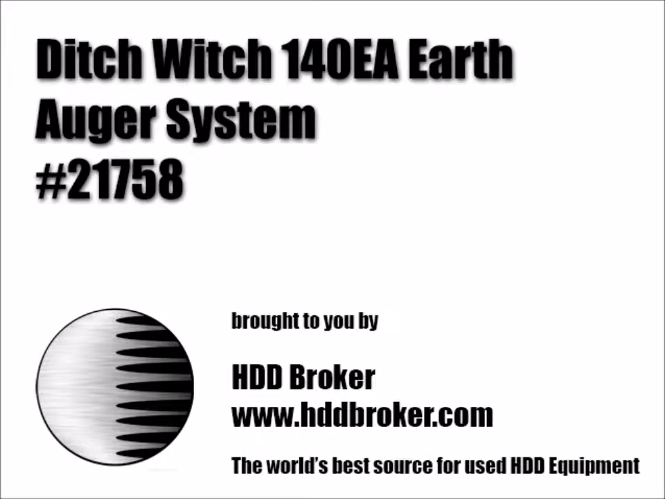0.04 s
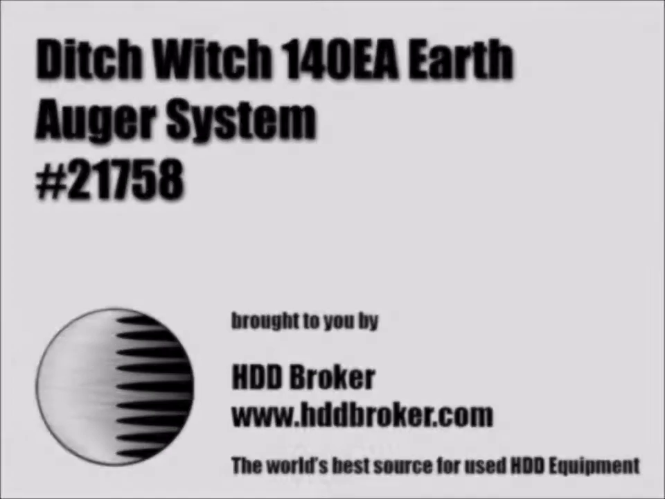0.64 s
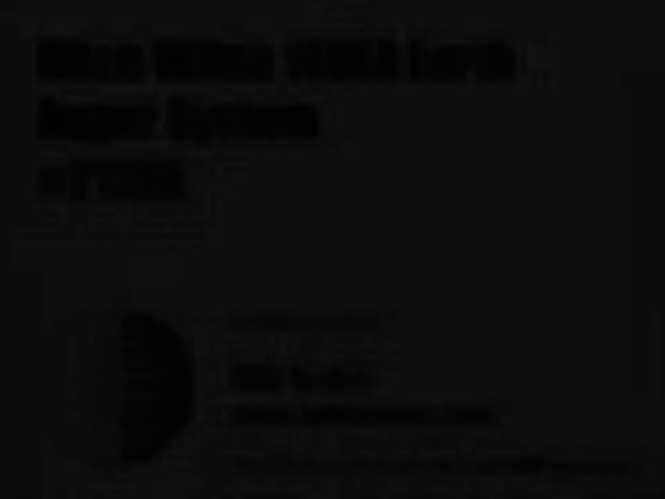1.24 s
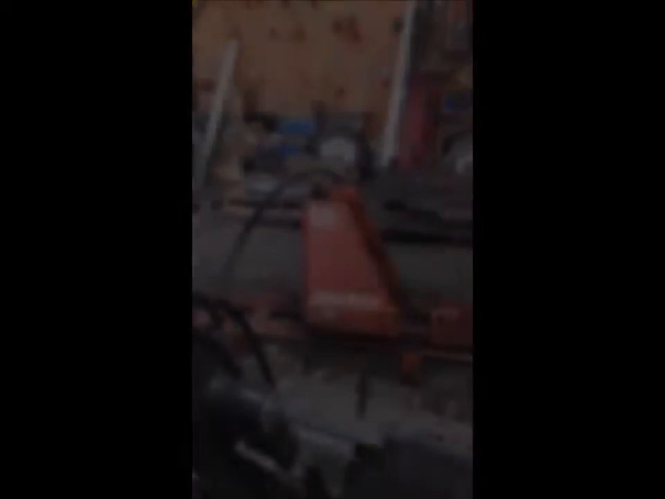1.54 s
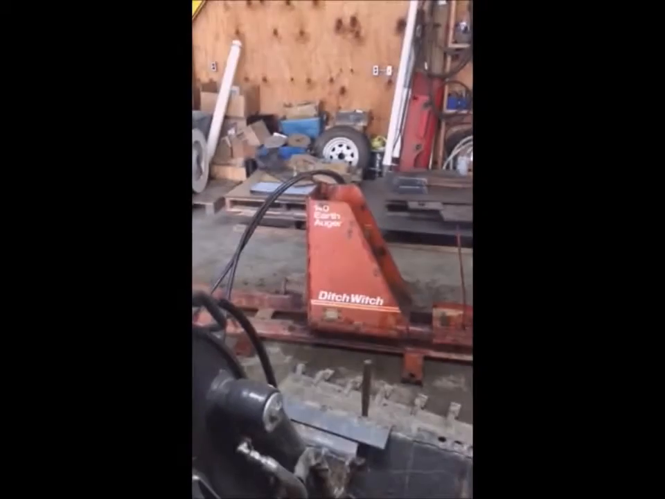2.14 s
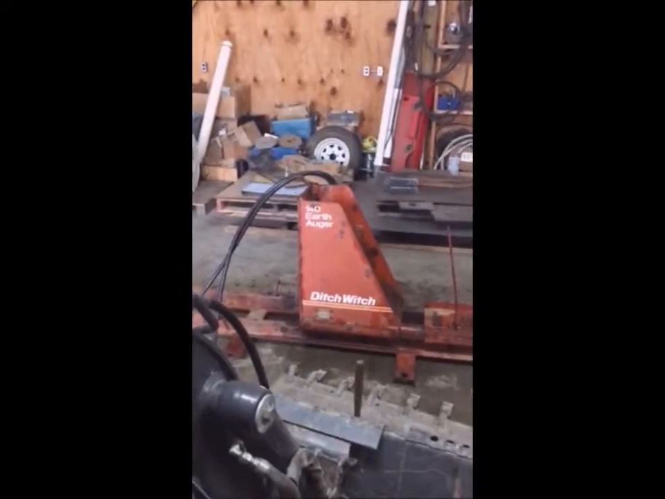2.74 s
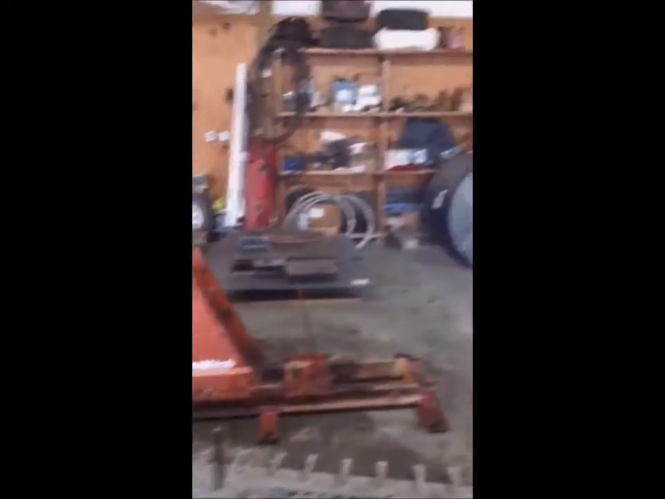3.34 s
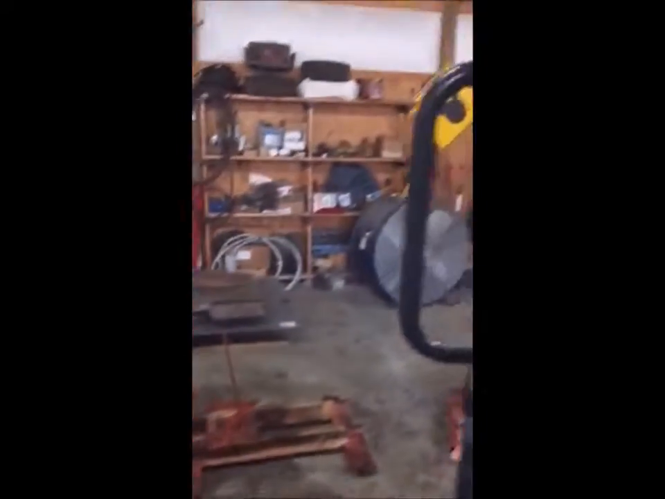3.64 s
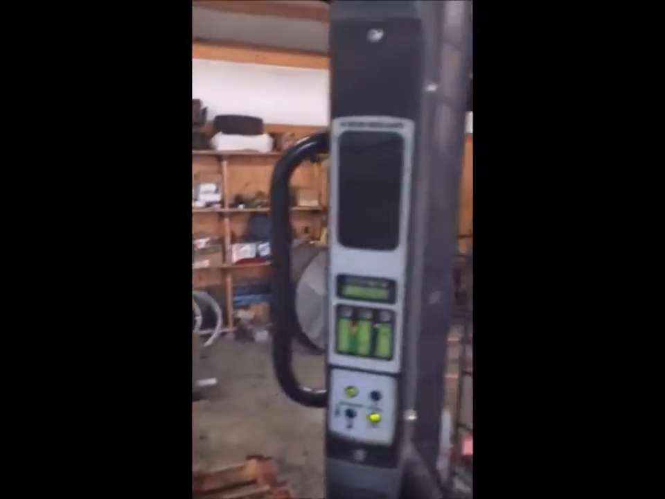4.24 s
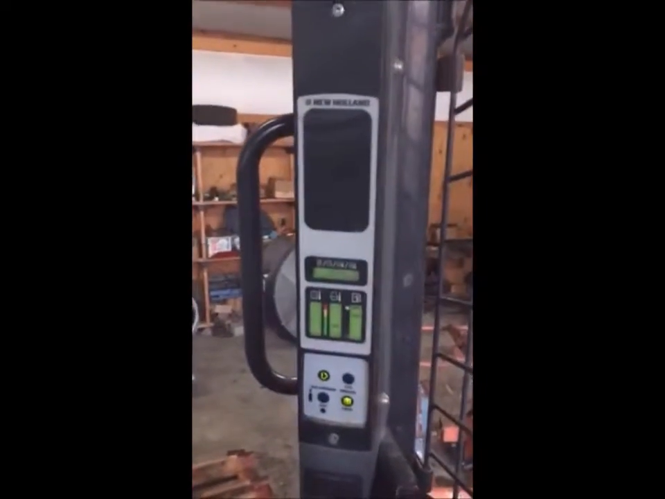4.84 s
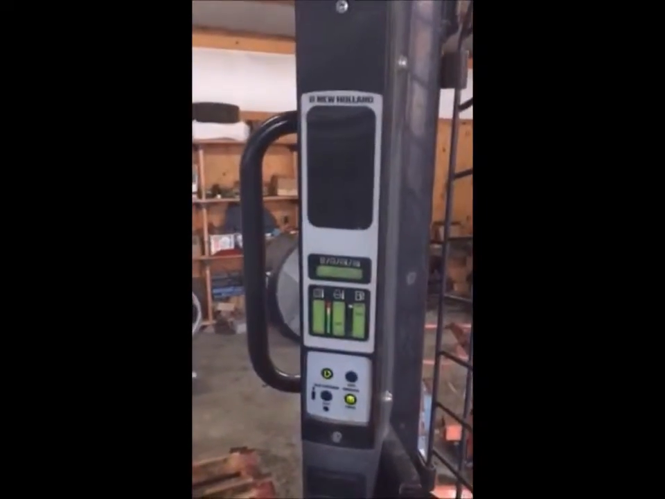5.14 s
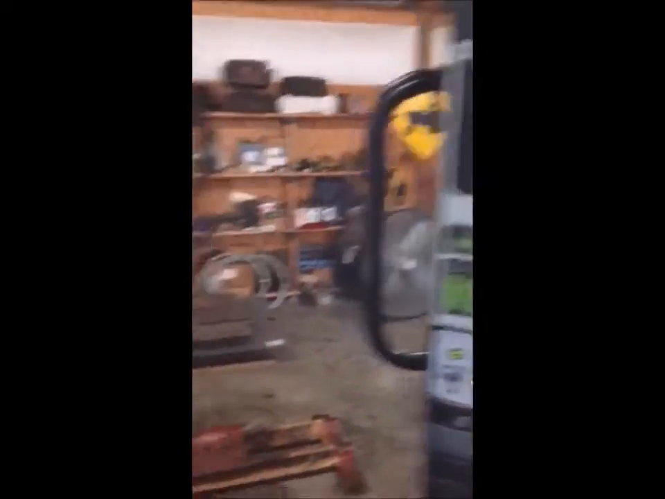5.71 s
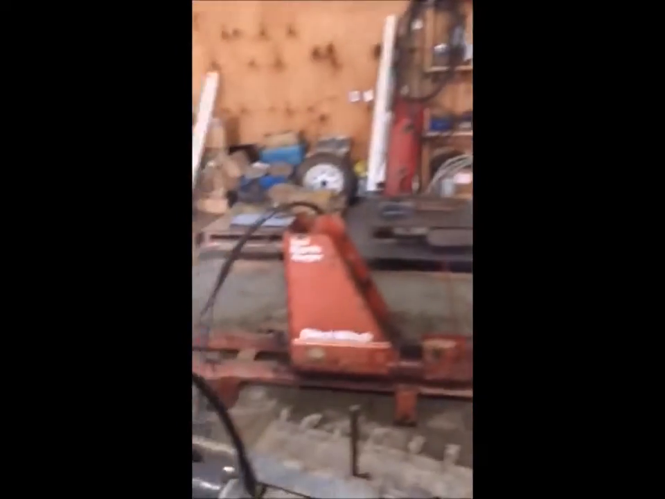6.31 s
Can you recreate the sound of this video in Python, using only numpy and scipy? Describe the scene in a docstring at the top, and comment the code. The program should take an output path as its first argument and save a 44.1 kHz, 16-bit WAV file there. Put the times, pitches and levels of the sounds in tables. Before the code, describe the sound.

After a brief silence, the sound of a diesel loader driving an earth auger cuts in, close and steady inside a workshop. A strong gear whine sits over a low hum, exhaust rumble, knocking and valve clatter, with hydraulic whine and hiss above. As the microphone in the cab turns away about halfway through, the whine softens, then comes back strongly near the end.

```python
"""In a workshop, a four-cylinder diesel loader runs at a governed speed and drives an earth auger.
A strong gear whine, the firing hum, gas rumble, knock and valve clatter are locked to the engine cycle;
a seven-piston hydraulic unit whines, and its pulsating oil jet hisses and rings the pipes.
The microphone in the cab turns from the auger to the door post and most of the way back,
through the standing waves of the whine. The sound cuts in after a silent start."""
import sys
import numpy as np
from scipy import signal
from scipy.fft import rfft, irfft, next_fast_len
from scipy.io import wavfile
from scipy.ndimage import map_coordinates

SR = 44100
rng = np.random.default_rng(int(sys.argv[2]) if len(sys.argv) > 2 else 0)


def output_pcm(signal):
    """Save a mono or channel-first signal as 16-bit PCM at the path in sys.argv[1].

    Samples are clipped to [-1, 1] before scaling.
    """
    pcm = np.clip(np.atleast_2d(signal).T, -1, 1) * 32767
    wavfile.write(sys.argv[1], SR, np.round(pcm).astype(np.int16))


N = 280917

# Levels are relative within each source; orders are rounded to whole numbers in use.
# microphone path: t/s, place (0 = auger, 1 = door post)
MIC_PATH = [(3.12, 0.039), (3.6, 0.48), (4.4, 0.68), (5.55, 1), (5.88, 0.4), (6.3, 0.18)]
# spectrum of the oil jet: f/Hz, level/dB
JET_SPECTRUM = [(700, -30), (1700, -8), (2700, -3), (3250, -1.5), (4000, -9.5), (4900, -10.5), (5900, -1.5),
                (6800, 0), (7700, -1.5), (8600, -2.5), (10400, -8.5), (11300, -10), (13000, -14),
                (15600, -19)]
# modes of valve block and pipes: f/Hz, bandwidth/Hz, level at auger/dB, level at post/dB
PIPE_MODES = [(3170, 100, -1, -4.5), (5520, 29, -2, -11), (6550, 88, -0.5, 0.5), (6930, 180, -1.5, -4),
              (8300, 100, -3, -18), (8790, 80, -10, -13)]
# knock of each cylinder, in firing order: level/dB
KNOCK_LEVELS = [-1.5, -1.5, -7, -13]
# modes of the engine block: f/Hz, bandwidth/Hz, level/dB
BLOCK_MODES = [(1649, 104, 3.5), (2050, 130, -5.5), (3230, 200, -12)]
# spectrum of valve and injector impacts: f/Hz, level/dB
IMPACT_SPECTRUM = [(200, -38), (500, -8), (620, -0.5), (850, -2.5), (1020, -1), (1300, -5), (1450, -4.5),
                   (1650, -3.5), (2000, -6), (2300, -6), (2800, -13.5), (3250, -10.5), (4200, -17),
                   (6000, -28), (15000, -55)]
# engine tones: order of the four-stroke cycle, level at auger/dB, level at post/dB
ENGINE_TONES = [(7, -42, -36), (11, -45, -42), (13, -39, -41), (22, -50, -45), (28, -37, -46),
                (38, -39.5, -39.5), (44, -44.5, -47), (62.57, -53, -43), (100.5, -43, -40.5),
                (105.3, -46, -54), (106.9, -45.5, -44), (121, -56, -47.5), (149.9, -59, -47)]
# hydraulic tones: order of the pump shaft, level at auger/dB, level at post/dB
PUMP_TONES = [(6, -40, -33.5), (21, -31.5, -34), (28, -48, -44), (34, -45, -51), (35, -29, -32.5),
              (36, -43, -45), (50, -44, -52)]
# spectrum of exhaust and intake noise: f/Hz, level/dB
GAS_SPECTRUM = [(20, -24), (45, -11), (75, -2.5), (105, 1.5), (135, -2.5), (165, 1.5), (215, -2), (260, -7),
                (370, -8.5), (480, -16), (700, -15), (1300, -23), (2500, -33), (6000, -45.5)]
# overtones of the firing pulse: harmonic number, level at auger/dB, level at post/dB
FIRING_OVERTONES = [(2, -24.5, -25), (3, -34, -31.5), (4, -53, -39.5), (5, -67, -49)]
# gear mesh tone at the microphone: t/s, level/dB
MESH_LEVEL = [(0.7, -17), (2.95, -17), (3.23, -18), (3.61, -31), (4.4, -22.5), (6.0, -24.5), (6.22, -17.5),
              (6.35, -16)]
# mesh overtones standing in the cab, each with one loud or dead spot:
# harmonic number, level at auger/dB, level at post/dB, spot place, spot width, gain at spot/dB
STANDING_WAVES = [(2, -31, -34.5, 0.46, 0.17, 5), (3, -35.5, -42.5, 0.24, 0.1, -12)]
# brief dips of the treble: t/s
TREBLE_DIPS = [2.110, 3.241, 6.142]

RPM, CYLINDERS, GEAR_TEETH = 1881, 4, 12
PISTONS, PUMP_RATIO = 7, 0.64  # pump turns per crank turn


def amp(db):
    """Amplitude ratio of a level in decibels."""
    return np.exp(np.asarray(db) * np.log(10) / 20)


def unit(x):
    """Normalisation to rms 1."""
    return x / np.sqrt(np.mean(x ** 2) + 1e-20)


def curve(rows):
    """Linear interpolation of (t/s, value) rows at every sample."""
    return np.interp(np.arange(N) / SR, *np.transpose(rows))


def wobble(rate):
    """Smooth random fluctuation: a spline of rms about 1 through `rate` knots a second."""
    knots = rng.standard_normal(int(N * rate / SR) + 4)
    steps = np.arange(0, len(knots) - 1, 1 / 8)
    return np.interp(np.arange(N) * rate / SR, steps, unit(map_coordinates(knots, [steps])))


def spot(place, centre, width):
    """Gaussian weighting of place, 1 at the centre."""
    return np.exp(-((place - centre) / width) ** 2)


def filtered(x, response):
    """Linear filtering: the spectrum of x is multiplied by a frequency response."""
    size = next_fast_len(N + SR // 2)
    return irfft(rfft(x, size) * response(np.fft.rfftfreq(size, 1 / SR)), size)[:N]


def lowpass(x, cutoff_hz, slope):
    """Zero-phase low-pass: above the cutoff, amplitude falls as frequency to the power -slope."""
    return filtered(x, lambda hz: 1 / (1 + (hz / cutoff_hz) ** slope))


def coloured(x, spectrum):
    """Spectral shaping by (f/Hz, level/dB) points, at rms 1."""
    f, db = np.transpose(spectrum)
    return unit(filtered(x, lambda hz: amp(np.interp(np.log(hz + 1), np.log(f), db))))


def resonances(x, modes):
    """Modal superposition: x drives damped resonators of alternating sign; the sum has rms 1."""
    def response(f):
        return sum((-1) ** k * amp(db) * 1j * f * width / (f0 ** 2 - f ** 2 + 1j * f * width)
                   for k, (f0, width, db) in enumerate(modes))
    return unit(filtered(x, response))


def ring(t60):
    """Impulse response of dense modes: noise of energy 1 that decays by 60 dB in t60 seconds."""
    t = np.arange(SR // 8) / SR
    tail = rng.standard_normal(len(t)) * amp(-60 * t / t60)
    return tail / np.linalg.norm(tail)


def cab_reflections(x, facing, wet_db, t60):
    """Reverberation: cab and workshop add reflections whose pattern changes as the microphone turns."""
    front, side = (signal.oaconvolve(x, ring(t60))[:N] for _ in range(2))
    return unit(x + amp(wet_db) * (np.sqrt(1 - facing) * front + np.sqrt(facing) * side))


def oil_flow(pump_turns, spurt, fade_strokes, scatter_db, grain_db):
    """Flow ripple: each piston adds a decaying, crackling spurt to the steady strength of the jet."""
    strokes = pump_turns * PISTONS
    stroke = strokes.astype(int)
    piston_db = 1.1 * unit(rng.standard_normal(PISTONS))
    stroke_db = scatter_db * rng.standard_normal(N // 100)
    size = amp(piston_db[stroke % PISTONS] + stroke_db[stroke])
    decay = np.exp(-(strokes % 1) / fade_strokes)
    return (1 + spurt * size * decay) * amp(grain_db * wobble(2500))


def pipe_ring(flow, place, facing):
    """Forced resonance: the jet rings the pipes, and each side of the cab favours different modes."""
    jet = flow * rng.standard_normal(N)
    at_auger = resonances(jet, [(hz, width, db) for hz, width, db, _ in PIPE_MODES])
    at_post = resonances(jet, [(hz, width, db) for hz, width, _, db in PIPE_MODES])
    level = -39.5 + 4.5 * spot(place, centre=0.33, width=0.23)  # highest when facing the pipes
    return amp(level) * ((1 - facing) * at_auger + facing * at_post)


def oil_hiss(flow, facing):
    """Jet noise follows the flow; towards the post its lower band rises and its top is shaded."""
    jet = coloured(flow * rng.standard_normal(N), JET_SPECTRUM)
    hiss = cab_reflections(jet, facing, wet_db=-4, t60=0.098)
    lower = lowpass(hiss, cutoff_hz=7900, slope=8)
    return amp(-34 + 2 * facing) * lower + amp(-34 - 2 * facing) * (hiss - lower)


def combustion_knock(cycles, fade_firings):
    """Transient excitation: each firing drives the block's modes with a burst, uneven among cylinders."""
    firings = cycles * CYLINDERS
    level = np.array(KNOCK_LEVELS)[firings.astype(int) % CYLINDERS]
    burst = rng.standard_normal(N) * amp(level) * np.exp(-(firings % 1) / fade_firings)
    return unit(lowpass(resonances(burst, BLOCK_MODES), cutoff_hz=4000, slope=4))


def valve_clatter(cycles, t60, scatter_db, jitter_s, parts):
    """Impact sound: each valve or injector strikes at its own angle of the cycle and rings the block."""
    out = np.zeros(N + SR)
    whole_cycles = np.arange(int(cycles[-1]) + 1)
    for part in range(parts):
        angle = (part + rng.random()) / parts
        tick = ring(t60)
        late, size = rng.standard_normal((len(whole_cycles), 2)).T
        due = np.interp(whole_cycles + angle, cycles, np.arange(N), right=N + SR // 2)
        onsets = np.abs(due + late * jitter_s * SR).astype(int)
        for at, gain in zip(onsets, amp(scatter_db * size)):
            out[at:at + len(tick)] += gain * tick
    return coloured(out[:N], IMPACT_SPECTRUM)


def shaft_tones(turns, orders, facing, waver_db):
    """Rotational harmonics: tones locked to a shaft waver in level and vary with microphone direction."""
    out = np.zeros(N)
    waver = waver_db * wobble(5.4)
    for order, auger_db, post_db in orders:
        start, shift = rng.random(2)
        level = auger_db + (post_db - auger_db) * facing + np.roll(waver, int(shift * N))
        out += amp(level) * np.sin(2 * np.pi * (round(order) * turns + start))
    return np.sqrt(2) * out


def gas_rumble(cycles, throb):
    """Amplitude modulation: exhaust and intake noise swells with each firing."""
    swell = 1 + throb * np.cos(2 * np.pi * CYLINDERS * cycles)
    return coloured(rng.standard_normal(N) * swell, GAS_SPECTRUM)


def firing_hum(cycles, place, facing):
    """Fourier series of the firing pulse: one pressure wave per firing, rising steeply, falling slowly."""
    phase = 2 * np.pi * CYLINDERS * cycles
    fundamental_db = -24 - 1.5 * place + 1.4 * wobble(5)
    overtones = sum(amp(auger_db + (post_db - auger_db) * facing) * np.sin(round(k) * phase)
                    for k, auger_db, post_db in FIRING_OVERTONES)
    return np.sqrt(2) * (amp(fundamental_db) * np.sin(phase) + overtones)


def gear_whine(crank_turns, place, flutter_db, waver_rad):
    """Periodic tooth contact radiates a mesh tone, whose overtones form standing waves in the cab."""
    phase = 2 * np.pi * GEAR_TEETH * crank_turns + waver_rad * wobble(20)
    out = amp(curve(MESH_LEVEL) + 0.28 + flutter_db * wobble(25.02)) * np.cos(phase)
    for k, auger_db, post_db, centre, width, spot_db in STANDING_WAVES:
        level = auger_db + (post_db - auger_db) * place + spot_db * spot(place, centre, width)
        out += amp(level + k * flutter_db * wobble(25.2)) * np.cos(round(k) * phase)
    return np.sqrt(2) * out


def scene():
    """Superposition: engine and hydraulics, locked to the crank, add at the turning microphone."""
    rpm = RPM + 1.3 * wobble(3)  # the governor lets the speed wander
    crank_turns = np.cumsum(rpm) / 60 / SR
    cycles = crank_turns / 2  # four-stroke cycles
    pump_turns = crank_turns * PUMP_RATIO
    place = np.clip(curve(MIC_PATH), 0, 1)
    facing = np.clip(place / 0.56, 0, 1)  # share of the sound from the post's side of the cab

    hum = firing_hum(cycles, place, facing) + shaft_tones(cycles, ENGINE_TONES, facing, waver_db=1)
    gears = gear_whine(crank_turns, place, flutter_db=0.26, waver_rad=0.043)
    pump = amp(-0.7) * shaft_tones(pump_turns, PUMP_TONES, facing, waver_db=1.4)
    gas = amp(-23 + 0.6 * facing) * gas_rumble(cycles, throb=0.32)
    impacts = valve_clatter(cycles, t60=0.032, scatter_db=1.6, jitter_s=0.00008, parts=20)
    valves = amp(-30.5 + 0.5 * facing) * cab_reflections(impacts, facing, wet_db=-1, t60=0.077)
    knock = amp(-36 - 5.5 * facing) * combustion_knock(cycles, fade_firings=0.4)
    flow = oil_flow(pump_turns, spurt=1.7, fade_strokes=0.3, scatter_db=0.6, grain_db=1)
    oil = oil_hiss(flow, facing) + pipe_ring(flow, place, facing)
    return (oil + knock + valves + pump + gas + hum + gears)[None]


def record(dry):
    """Gating and band limiting: the sound cuts in, and its treble dips briefly three times."""
    t = np.arange(N) / SR
    low = lowpass(dry[0], cutoff_hz=2000, slope=12)
    dips = [1 - 0.81 * np.exp(-np.abs((t - at) / 0.01) ** 1.38) for at in TREBLE_DIPS]
    treble = np.prod(dips, axis=0) * (dry[0] - low)
    sound = (low + treble) * (t > 0.653)
    return lowpass(sound, cutoff_hz=15700, slope=400)[None]


dry = scene()
out = record(dry)
output_pcm(out)
```